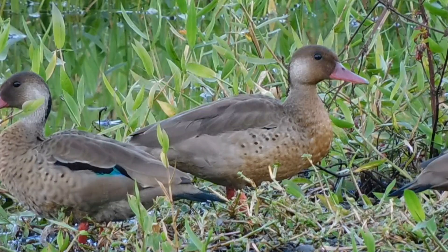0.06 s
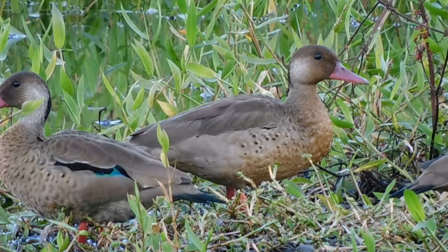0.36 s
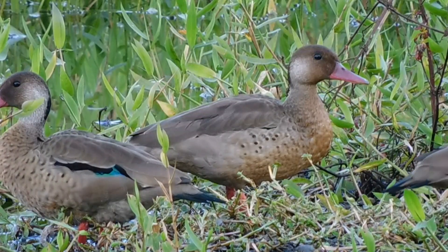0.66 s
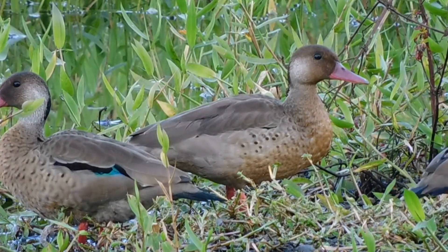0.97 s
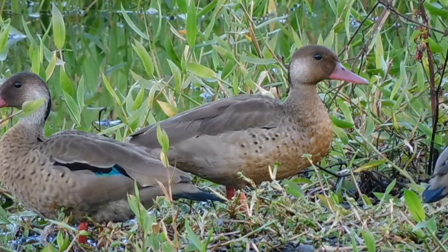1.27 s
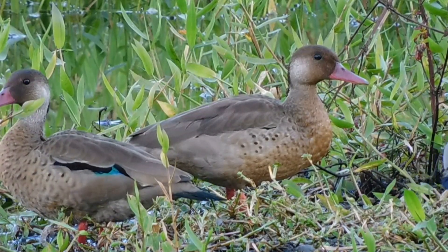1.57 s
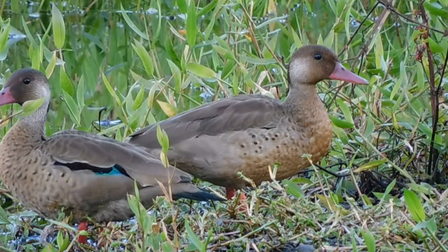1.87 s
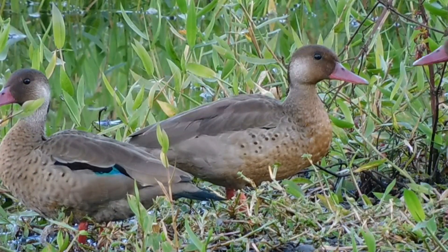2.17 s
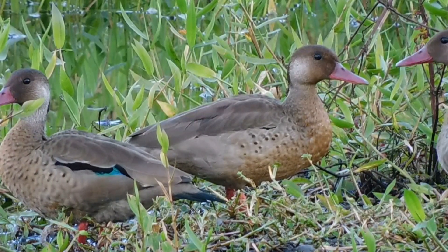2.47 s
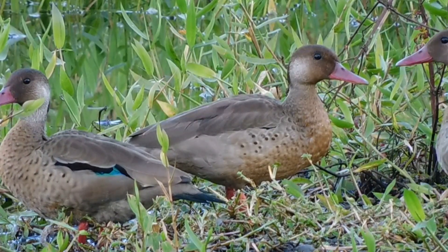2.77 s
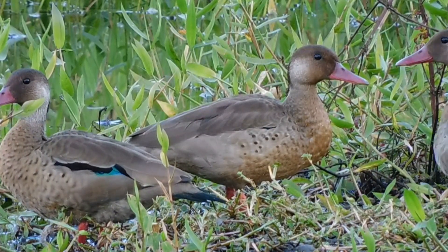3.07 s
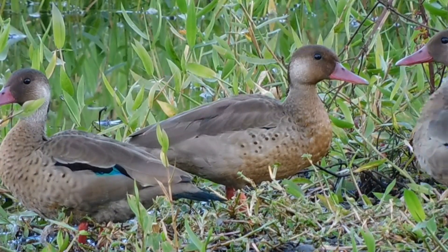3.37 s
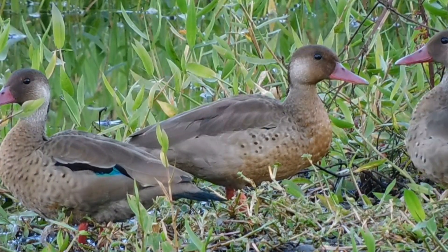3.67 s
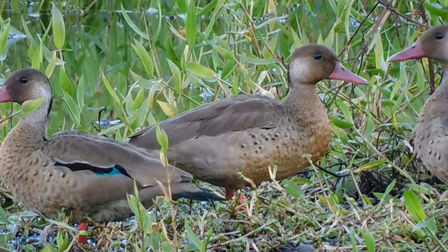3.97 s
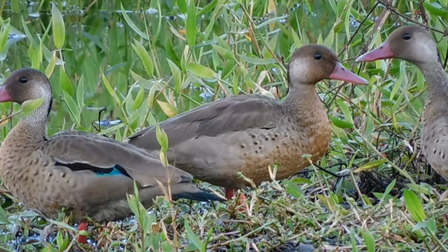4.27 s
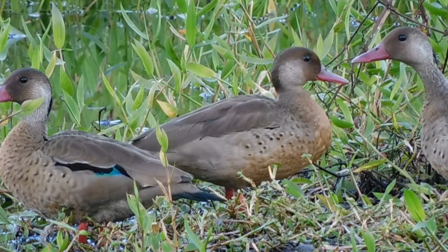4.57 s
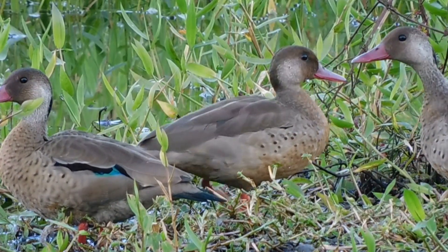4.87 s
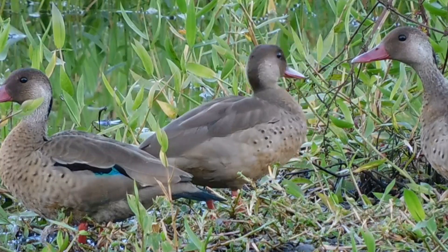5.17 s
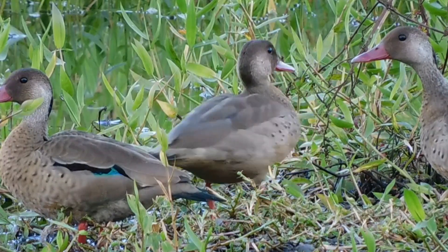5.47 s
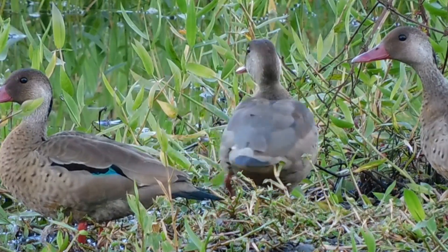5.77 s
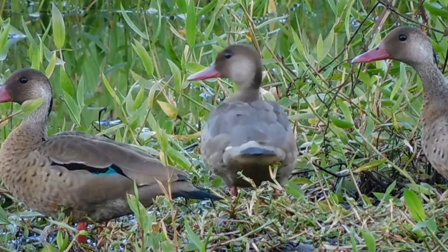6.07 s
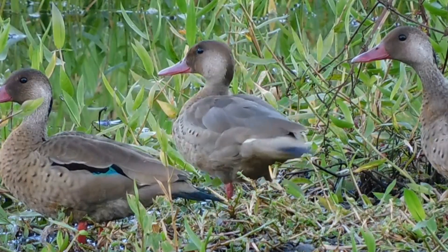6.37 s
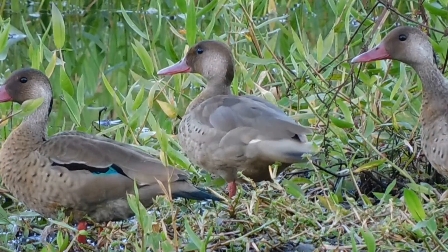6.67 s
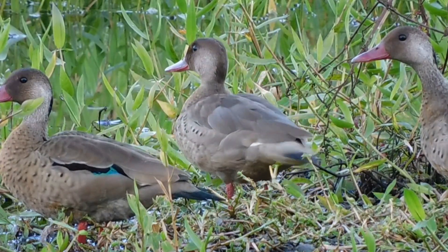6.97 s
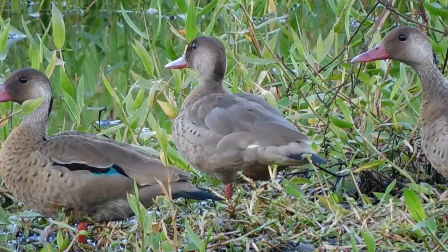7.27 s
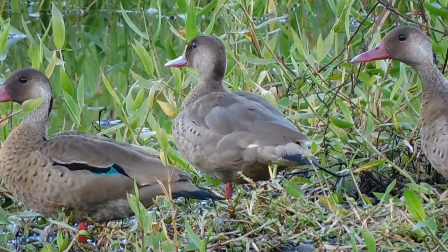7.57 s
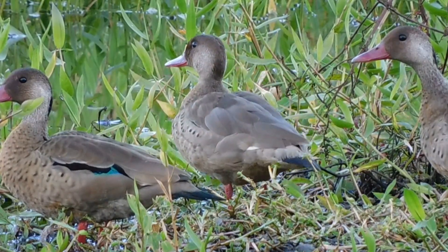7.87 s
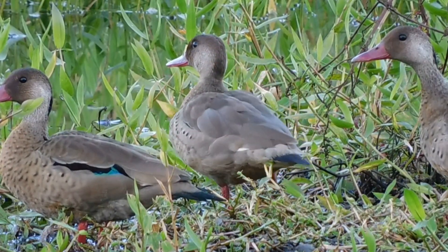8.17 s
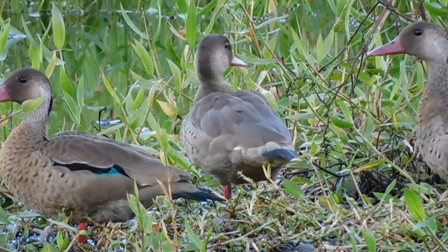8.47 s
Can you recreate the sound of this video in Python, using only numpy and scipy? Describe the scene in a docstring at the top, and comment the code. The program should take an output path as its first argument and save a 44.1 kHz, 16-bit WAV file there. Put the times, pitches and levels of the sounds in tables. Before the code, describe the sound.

In a marsh, a songbird gives three high falling whistles, each louder, then a rapid run of chirps and trills. After a pause with faint distant birds, it makes short sharp chips. A nearby duck gives one airy whistle that rises and falls, and the song starts again. Low wind gusts buffet the microphone throughout, over faint insects, distant traffic and tiny crunches of duck feet.

```python
"""Marsh songbird and ducks in wind.

A songbird opens with ever louder sliding whistles, runs through repeated syllables, chips, restarts.
One nearer whistle, likely a drake, arches up and down; other birds call far off. Reeds scatter each
note. Ducks' feet crush dry litter. Gusts buffet the microphone over faint insects and a distant road."""
import sys
import numpy as np
from scipy import signal
from scipy.fft import rfft, irfft
from scipy.io import wavfile
from scipy.ndimage import uniform_filter1d

SR = 44100
rng = np.random.default_rng(int(sys.argv[2]) if len(sys.argv) > 2 else 0)


def transcribe(u):
    """Save the signal u as a 16-bit wav file named by the first command-line argument.

    u: samples, shape (n,) or (channels, n), limited to [-1, 1]; the rate is SR.
    q: integer samples, one column per channel.
    """
    v = np.clip(np.atleast_2d(u).T, -1, 1)
    q = np.round(v * 32767).astype(np.int16)
    wavfile.write(sys.argv[1], SR, q)


N = 385434
TIME_S = np.arange(N) / SR

# Table levels are relative: gains apply later.
# Noise spectra: freq_hz, density_db
ROAD_SPECTRUM = [(60, 7), (150, 4), (300, 2), (500, 1.5), (800, 0), (1200, -4), (1700, -10), (2500, -13.5),
                 (5000, -33)]
INSECT_SPECTRUM = [(2000, -11), (3000, -11), (3700, -1.5), (4500, 2.5), (5000, -4), (5600, -20),
                   (8000, -13)]
HISS_SPECTRUM = [(200, 2.5), (2000, -1.4), (5000, 3), (8000, 0.4), (12000, -1.4), (15500, -1.7)]
RUMBLE_SPECTRUM = [(8, -13.5), (20, 0.5), (30, 2), (50, -2.5), (80, -7), (110, -15), (160, -35.5),
                   (300, -66), (600, -113)]
EDDY_SPECTRUM = [(50, -46), (90, 2), (120, 2.5), (170, -3), (250, -16), (350, -26.5), (600, -36),
                 (1500, -73)]
# Background envelopes: time_s, level_db
ROAD_LEVELS = [(0.0, -57.5), (5.6, -58.5), (6.7, -57.5), (8.06, -55), (8.74, -56.5)]
MOTOR_LEVELS = [(7.4, -69), (7.8, -47.5), (8.74, -42.5)]
WHINE_LEVELS = [(7.74, -100), (7.83, -57.5), (8.0, -56.5), (8.13, -54.5), (8.24, -100)]
INSECT_LEVELS = [(0, -66), (2, -63.5), (5.5, -67.5), (6.8, -66.5), (7.7, -64)]
BREEZE_LEVELS = [(0.0, -31), (1.95, -35.5), (2.77, -28), (3.82, -44), (4.38, -31), (6.16, -41), (6.67, -33),
                 (8.35, -43), (8.74, -41)]
# Gusts: peak_s, length_s, rumble_db, eddy_db
GUSTS = [(.0, .2, -25, -40), (0.405, 0.075, -25, -36), (0.706, .11, -19.5, -35), (0.885, 0.24, -24, -42),
         (1.383, 0.3, -29.5, -51), (2.09, 0.25, -23, -35.5), (2.622, .28, -22.5, -39.5),
         (2.904, 0.11, -23, -47.5), (3.096, 0.055, -26.5, -36), (3.374, 0.32, -27.5, -57),
         (3.95, 0.24, -35.5, -62), (4.472, 0.2, -25, -38), (4.857, 0.094, -22, -39),
         (5.273, .08, -22.5, -37.5), (5.398, 0.079, -21.5, -31), (5.863, .2, -36.5, -38),
         (6.19, .07, -33.5, -50), (6.57, .13, -26, -39.5), (6.83, 0.081, -28.5, -44),
         (7.028, 0.041, -21.5, -41), (7.314, 0.077, -24, -53), (7.971, .14, -33, -35),
         (8.674, .05, -29.5, -45.5)]
# Single vortices: centre_s, strength_db, width_s
VORTICES = [(0.213, -18.5, 0.0014), (0.412, -9, 0.0032), (0.699, -10, .0013), (0.713, -7.5, 0.0037),
            (3.04, -14, 0.0018), (3.109, -7, 0.0028), (4.377, -5, 0.0041), (4.434, -6, 0.0031),
            (4.86, -7, 0.003), (5.406, -26, 0.0035)]
# Steps in litter: start_s, length_s, level_db, centre_hz
FOOTFALLS = [(.955, 0.045, -60, 1010), (1.788, 0.021, -62, 1500), (3.031, 0.062, -67, 1500),
             (5.269, 0.085, -62, 1880), (5.46, .02, -60.5, 2060), (5.81, 0.029, -58.5, 1700),
             (5.988, 0.059, -57.5, 1200), (6.558, 0.077, -60.5, 1310), (7.158, 0.046, -57.5, 870),
             (7.518, .055, -57, 1700)]
# Distant glides: start_s, length_s, start_hz, end_hz, level_db
FAR_GLIDES = [(4.729, .25, 3860, 3014, -65.5), (5.247, 0.085, 2750, 3050, -67),
              (5.76, 0.076, 2600, 3960, -68), (5.817, .07, 4250, 4300, -64), (6.96, .08, 4240, 5860, -66.5),
              (8.473, .14, 6060, 6020, -51.5), (8.642, 0.096, 5380, 5080, -55)]
# Distant hooked notes and arched peeps: start_s, level_db
FAR_HOOKS = [(3.33, -65), (3.58, -68), (3.79, -70), (7.99, -71)]
FAR_PEEPS = [(.145, -67.5), (.335, -68), (0.539, -66.5), (.76, -68.5), (.99, -67), (1.275, -65),
             (8.32, -69)]
# Their contours: length_s, start_hz, middle_hz, end_hz
HOOK_CONTOUR = (.1, 3220, 3520, 2620)
PEEP_CONTOUR = (0.0753, 940, 1165, 1030)
# Drake's register breaks: effort_share, jump_hz
DRAKE_REGISTERS = [(.43, 483), (.87, 291)]
# Opening slides: start_s, length_s, top_hz, level_db, swell_db
SONG_SLIDES = [(0.336, 0.16, 4820, -62, 7), (.725, .14, 4910, -48.5, 18), (1.023, .178, 5640, -35.5, 12),
               (7.812, .1, 4410, -49.5, 9), (8.125, .172, 5480, -37.5, 4.5)]
# Notes by syllable: delay_s, length_s, start_hz, middle_hz, end_hz, level_db, swell_db
SYLLABLE_NOTES = { "plunge": [(0, .068, 6030, 5154, 4520, .5, 15.5), (.06, .055, 4850, 3944, 3554, -3, 6),
                  (.116, 0.0174, 2950, 2926, 3030, -11.5, -5), (.133, .019, 2650, 2560, 2530, -16, -7)],
                  "flick": [(0.00028, 0.0136, 6000, 5080, 4380, 0, 4)],
                  "tail": [(0, .015, 4680, 3730, 3500, -4.5, 8), (.014, .045, 3400, 3170, 2887, 0.5, 6)],
                  "sweep": [(0, 0.026, 6970, 6740, 6350, -6, 6), (.011, .054, 6750, 4635, 3660, 0, 2)],
                  "dip": [(0.0014, 0.021, 4150, 3430, 2930, 0.5, -7)],
                  "ping": [(0, .015, 3460, 3920, 6300, -8, 0), (.014, 0.031, 6390, 6360, 6260, -0.5, -1)],
                  "high slide": [(0, .056, 7400, 6650, 5830, -0.5, 10)],
                  "arch": [(0, 0.094, 2530, 3200, 2420, 0.5, 4)],
                  "zigzag": [(0, .017, 5820, 5760, 4350, -9.5, 12),
                  (.024, 0.0112, 4600, 5270, 5920, -4.5, -15), (.036, .03, 5300, 4070, 3440, 0, 1)],
                  "chirp": [(0, 0.0332, 2470, 2710, 3020, 0, 0)],
                  "trill": [(0, 0.0174, 5300, 4330, 3600, -4.5, 0),
                  (.019, .024, 3260, 3620, 4070, -0.5, 5)]}
# Song sequence: start_s, syllable, level_db
SONG_SEQUENCE = [ (1.271, "plunge", -32.5), (1.485, "flick", -43), (1.498, "flick", -38.5),
                 (1.511, "flick", -43), (1.526, "tail", -38.5), (1.627, "flick", -45.5),
                 (1.641, "sweep", -30.5), (1.735, "dip", -41.5), (1.752, "ping", -30.5),
                 (1.805, "dip", -39.5), (1.898, "high slide", -36), (1.983, "arch", -37),
                 (2.114, "zigzag", -33.5), (2.208, "zigzag", -33), (2.301, "chirp", -41.5),
                 (2.365, "chirp", -41), (2.457, "flick", -53), (2.477, "trill", -38.5),
                 (2.540, "trill", -37.5), (2.603, "trill", -40), (2.666, "trill", -43),
                 (8.366, "plunge", -31.5), (8.581, "flick", -38.5), (8.594, "flick", -35.5),
                 (8.607, "flick", -43), (8.622, "tail", -40), (8.728, "flick", -42.5)]
# High chips: start_s, lead_s, start_hz, turn_hz, end_hz, level_db
SONG_CHIPS = [(5.193, 0.019, 7600, 7780, 6800, -50), (5.495, 0.018, 6360, 6600, 4940, -44.5),
              (5.566, 0.017, 5010, 4900, 4830, -55.5), (5.639, 0.02, 6260, 6330, 4880, -41.5),
              (6.022, 0.025, 6300, 6780, 5160, -41), (6.107, 0.0084, 6080, 6160, 5600, -45.5),
              (6.132, 0.014, 4610, 4300, 3640, -52), (6.521, 0.0055, 6400, 6390, 5440, -47),
              (6.555, .016, 4700, 4270, 4020, -49), (6.61, 0.022, 6270, 7650, 5860, -41)]


def undb(db):
    """Decibels to gain."""
    return 10 ** (np.asarray(db) / 20)


def curve(levels):
    """Linearly interpolated envelope, dB."""
    return np.interp(TIME_S, *np.transpose(levels))


def add(track, start_s, sound):
    """Mix a sound in at start_s."""
    i = max(int(start_s * SR), 0)
    track[i:i + len(sound)] += sound[:max(len(track) - i, 0)]


def noise(spectrum):
    """Shaped noise, rms 1."""
    hz, db = np.transpose(spectrum)
    bins_hz = np.maximum(np.fft.rfftfreq(N, 1 / SR), 1)
    gain = undb(np.interp(np.log(bins_hz), np.log(hz), db))
    y = irfft(rfft(rng.standard_normal(N)) * gain, N)
    return y / y.std()


def stereo_noise(spectrum, side_db):
    """Mid/side noise."""
    return noise(spectrum) + undb(side_db) * noise(spectrum) * np.array([[1], [-1]])


def walk(rate_hz):
    """Smooth random motion, std 1."""
    k = max(int(SR / rate_hz), 1)
    y = uniform_filter1d(np.repeat(rng.standard_normal(N // k + 1), k)[:N], k)
    return y / y.std()


def drone(hz, levels, octave_db):
    """Slightly wandering tone plus octave."""
    phase = 2 * np.pi * np.cumsum(hz * (1 + 0.00398 * walk(25))) / SR
    return np.sqrt(2) * undb(curve(levels)) * (np.sin(phase) + undb(octave_db) * np.sin(2 * phase))


def road():
    """Distant traffic; a motor comes within earshot; a brief whine, perhaps a brake."""
    traffic = stereo_noise(ROAD_SPECTRUM, side_db=-5) * undb(curve(ROAD_LEVELS) + 4 + 1.06 * walk(9))
    motor = drone(hz=80.4, levels=MOTOR_LEVELS, octave_db=-14)
    whine = drone(hz=757, levels=WHINE_LEVELS, octave_db=-10.5)
    return traffic + motor + whine


def insects():
    """Flickering high hiss from the grass."""
    return stereo_noise(INSECT_SPECTRUM, side_db=-1) * undb(curve(INSECT_LEVELS) + 1.9 * walk(30))


def turbulence(spectrum, window_s):
    """Noise levelled to an even short-term power."""
    y = noise(spectrum)
    power = uniform_filter1d(y ** 2, int(window_s * SR))
    return y / np.sqrt(power + 0.0063)


def wind(breeze_gain_db=0.5, eddy_ratio_db=-18, waver_db=1.5, puff_db=2.75):
    """Gusts swell from the breeze, driving rumble and small eddies; vortices push, then pull."""
    rumble = undb(curve(BREEZE_LEVELS) + breeze_gain_db)
    eddies = rumble * undb(eddy_ratio_db)
    for peak_s, length_s, rumble_db, eddy_db in GUSTS:
        swell = np.exp(-2 * ((TIME_S - peak_s) / length_s) ** 2)
        rumble = np.hypot(rumble, undb(rumble_db) * swell)
        eddies = np.hypot(eddies, undb(eddy_db) * swell)
    out = rumble * undb(waver_db * walk(9)) * turbulence(RUMBLE_SPECTRUM, window_s=0.0887)
    out += eddies * undb(puff_db * walk(35) - 1) * turbulence(EDDY_SPECTRUM, window_s=0.0626)
    for centre_s, strength_db, width_s in VORTICES:
        u = (TIME_S - centre_s) / width_s
        out -= undb(strength_db) * u / (1 + u ** 2 / 3) ** 3
    return out


def footsteps(ticks_per_s=700):
    """Each footfall crushes dry stems: a short cloud of damped ticks."""
    out = np.zeros(N)
    for start_s, length_s, db, hz in FOOTFALLS:
        n = int(length_s * SR)
        ticks = rng.standard_normal(n) * (rng.random(n) < ticks_per_s / SR) * np.hanning(n)
        band = signal.butter(2, [hz * 0.62, hz * 1.23], "band", fs=SR, output="sos")
        crunch = signal.sosfilt(band, ticks) + 0.033 * ticks
        add(out, start_s, undb(db) * crunch / (crunch.std() + 1e-12))
    return out


def syrinx(hz, octave_db, third_db):
    """Bird tone: three harmonics, muted above Nyquist."""
    phase = 2 * np.pi * np.cumsum(hz) / SR
    partials = ((1, 0), (2, octave_db), (3, third_db))
    return np.sqrt(2) * sum(undb(db) * np.sin(k * phase) * (k * hz < SR / 2) for k, db in partials)


def sing(notes, attack_share, release_share, waver, rasp, octave_db):
    """Notes glide on a parabola through three pitches, swelling or fading; steep glides rasp."""
    out = np.zeros(N + SR)
    drift, flutter = walk(200), walk(900)
    for start_s, length_s, start_hz, middle_hz, end_hz, db, swell_db in notes:
        u = np.linspace(0, 1, max(int(length_s * SR), 16))
        span = (int(start_s * SR) + np.arange(len(u))) % N
        hz = np.polyval(np.polyfit([0, .5, 1], [start_hz, middle_hz, end_hz], 2), u)
        octaves_per_s = abs(np.log2(end_hz / start_hz)) / length_s
        hz *= 1 + waver * drift[span] + rasp * np.tanh(octaves_per_s / 25) * flutter[span]
        edge = np.clip(np.minimum(u / attack_share, (1 - u) / release_share), 0, 1)
        envelope = np.sin(edge * np.pi / 2) ** 2 * undb(db + swell_db * (u - .5))
        add(out, start_s, envelope * syrinx(hz, octave_db, third_db=-49))
    return out[:N]


def reeds(x, stems_db, stems_t60_s, bank_db, trees_db, trees_t60_s):
    """Stems scatter at once, the bank returns clustered echoes, trees add a longer tail."""
    t = np.arange(int(.8 * SR)) / SR
    stems = rng.standard_normal(len(t)) * undb(-60 * t / stems_t60_s) * (t > .001)
    echoes = rng.standard_normal(len(t)) * (rng.random(len(t)) < 500 / SR)
    bank = echoes * np.exp(-((t - .04) / 0.055) ** 2)
    trees = rng.standard_normal(len(t)) * undb(-60 * t / trees_t60_s) * np.minimum(t / 0.026, 1)
    parts = ((stems_db, stems), (bank_db, bank), (trees_db, trees))
    response = sum(undb(db) * part / np.linalg.norm(part) for db, part in parts)
    return (x + signal.fftconvolve(x, response)[:N]) / np.sqrt(1 + np.sum(response ** 2))


def far_birds(bow_ratio=1.02, fade_db=-5):
    """Bowed glides, hooked notes and octave-heavy peeps, through the reeds."""
    notes = [(s, length_s, start_hz, (start_hz + end_hz) / 2 * bow_ratio, end_hz, db, fade_db)
             for s, length_s, start_hz, end_hz, db in FAR_GLIDES]
    notes += [(s, *HOOK_CONTOUR, db, fade_db) for s, db in FAR_HOOKS]
    peeps = [(s, *PEEP_CONTOUR, db, 0) for s, db in FAR_PEEPS]
    calls = sing(notes, attack_share=0.2, release_share=0.15, waver=0.0075, rasp=0.09, octave_db=-30)
    calls += sing(peeps, attack_share=0.22, release_share=0.35, waver=0.015, rasp=0, octave_db=7)
    return reeds(calls, stems_db=-4, stems_t60_s=0.15, bank_db=-11.5, trees_db=-10.5, trees_t60_s=.6)


def drake(peak_s=7.19, rise_s=.19, fall_s=.272, low_hz=2904, bend_hz=870):
    """Airy arching whistle: pitch follows effort and jumps registers; level follows pitch."""
    db_per_khz, fade_db_per_s = 17.5, 6
    t = TIME_S - peak_s
    effort = np.maximum(1 - (t / np.where(t < 0, rise_s, fall_s)) ** 2, 0)
    jumps_hz = sum(jump_hz * (effort > threshold) for threshold, jump_hz in DRAKE_REGISTERS)
    hz = low_hz + bend_hz * effort + uniform_filter1d(jumps_hz.astype(float), size=300)
    below_top_khz = (hz.max() - hz) / 1000
    envelope = np.minimum(10 * effort, 1) * undb(-40.5 - db_per_khz * below_top_khz - fade_db_per_s * t)
    waver = 1 + .002 * walk(200)
    air = 1 + 0.17 * walk(900)
    whistle = envelope * air * syrinx(hz * waver, octave_db=-42, third_db=-35)
    return reeds(whistle, stems_db=-10, stems_t60_s=0.091, bank_db=-16, trees_db=-15.5, trees_t60_s=0.72)


def slide_notes(end_hz=3439, halfway_share=.31):
    """Each slide falls fast, then swells as it settles on a common pitch."""
    return [(s, length_s, top_hz, end_hz + halfway_share * (top_hz - end_hz), end_hz, db, swell_db)
            for s, length_s, top_hz, db, swell_db in SONG_SLIDES]


def syllable_notes():
    """Song sequence expanded to notes; repeats share a contour."""
    return [(s + delay_s, *contour, db + note_db, swell_db)
            for s, syllable, db in SONG_SEQUENCE
            for delay_s, *contour, note_db, swell_db in SYLLABLE_NOTES[syllable]]


def chip_notes(drop_s=0.0219, drop_db=-1.5, fade_db=-2.5):
    """Each chip: a straight lead-in, then a fading drop."""
    notes = []
    for s, lead_s, start_hz, turn_hz, end_hz, db in SONG_CHIPS:
        notes.append((s, lead_s, start_hz, (start_hz + turn_hz) / 2, turn_hz, db, 0))
        notes.append((s + lead_s, drop_s, turn_hz, (turn_hz + end_hz) / 2, end_hz, db + drop_db, fade_db))
    return notes


def songbird():
    """Clean slides, raspier syllables and chips, through the reeds."""
    slides, quick = slide_notes(), syllable_notes() + chip_notes()
    song = sing(slides, attack_share=0.16, release_share=0.09, waver=0.0028, rasp=.015, octave_db=-48)
    song += sing(quick, attack_share=0.15, release_share=0.11, waver=0.0036, rasp=0.055, octave_db=-40.5)
    return reeds(song, stems_db=-1, stems_t60_s=0.12, bank_db=-13, trees_db=-17, trees_t60_s=0.75)


def scene():
    """Birds, steps and wind centred; road noise, insects and an even hiss in stereo."""
    centre = undb(0.5) * songbird() + undb(2) * far_birds() + drake() + undb(4) * footsteps() + wind()
    return centre + road() + insects() + undb(-63.5) * stereo_noise(HISS_SPECTRUM, side_db=1)


def record(dry):
    """Steep elliptic low-pass."""
    cutoff_hz = 15500
    return signal.sosfilt(signal.ellip(10, .1, 80, cutoff_hz, fs=SR, output="sos"), dry)


dry = scene()
out = record(dry)
transcribe(out)
```